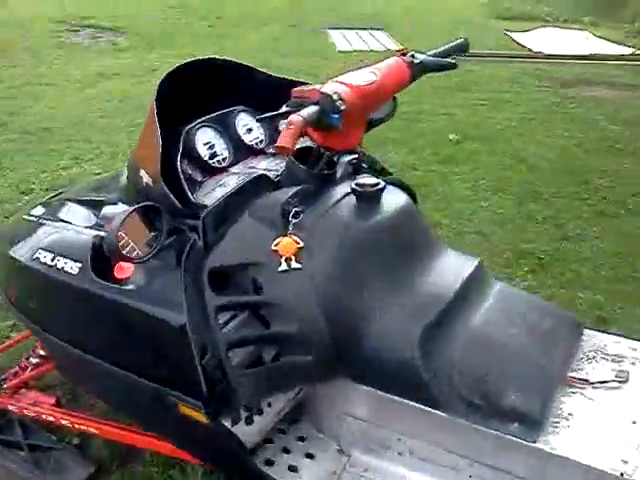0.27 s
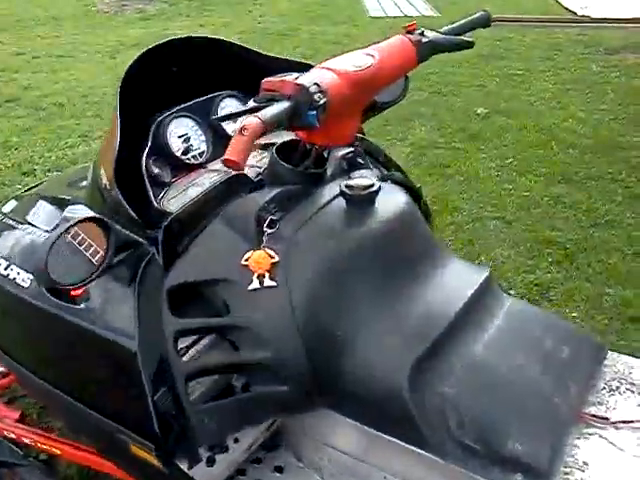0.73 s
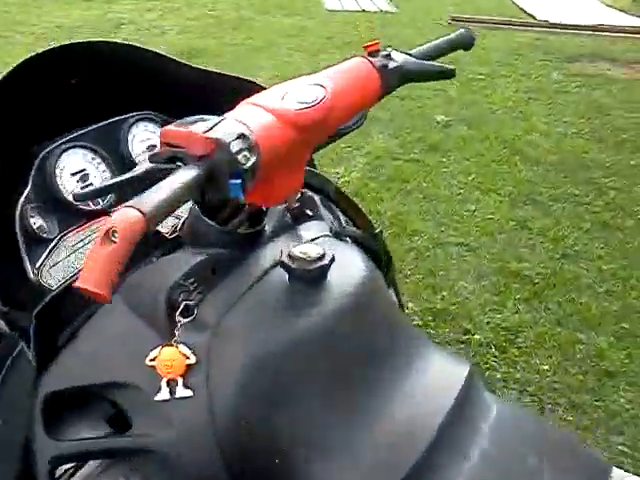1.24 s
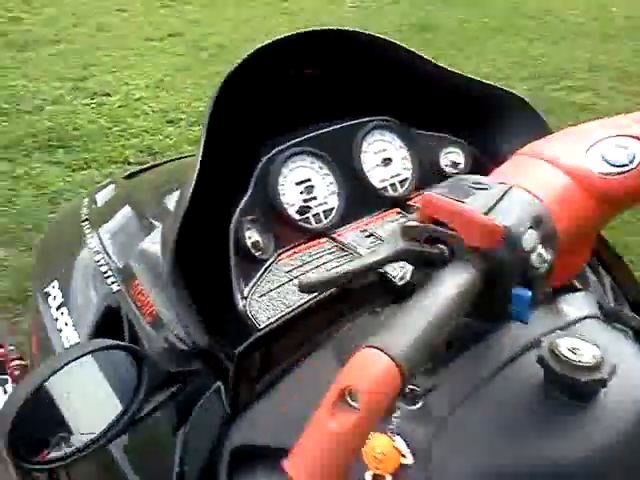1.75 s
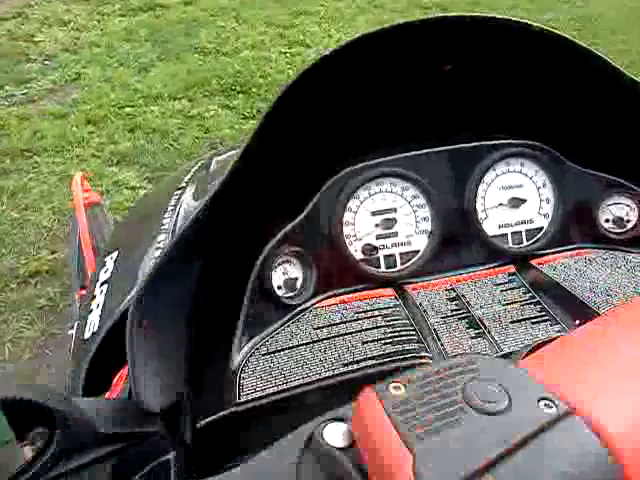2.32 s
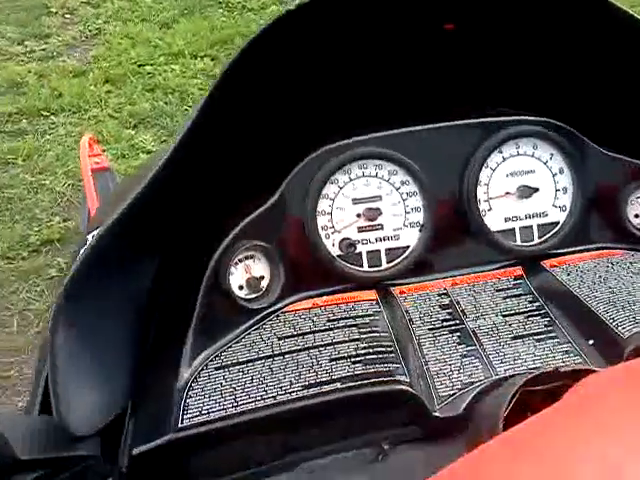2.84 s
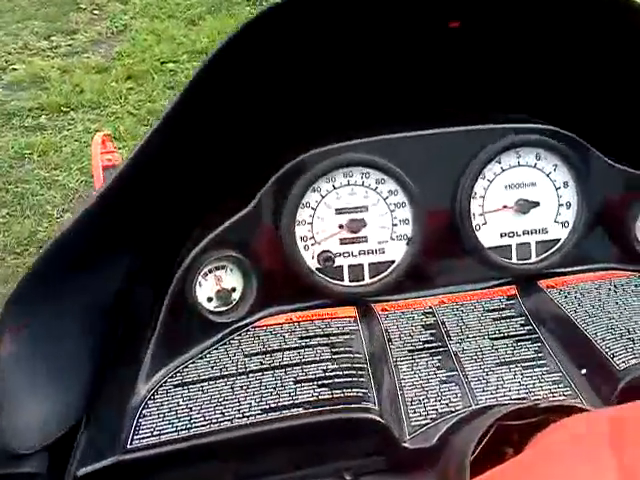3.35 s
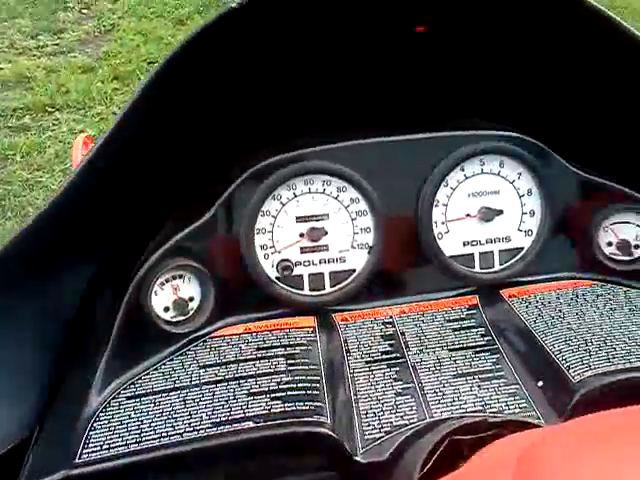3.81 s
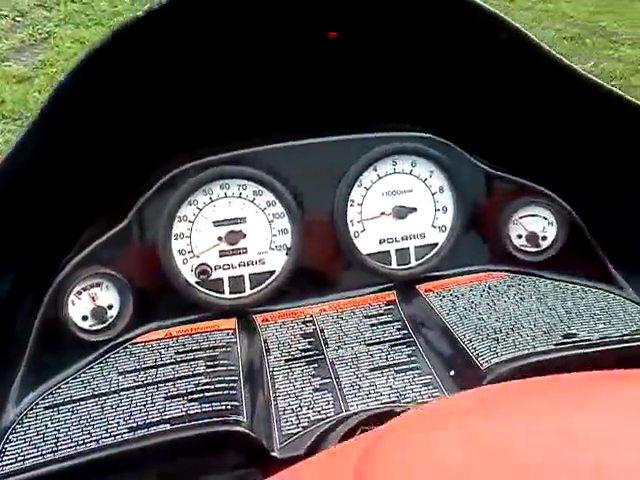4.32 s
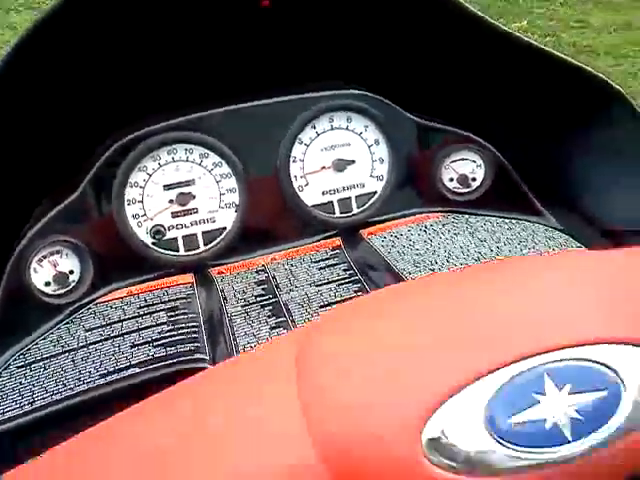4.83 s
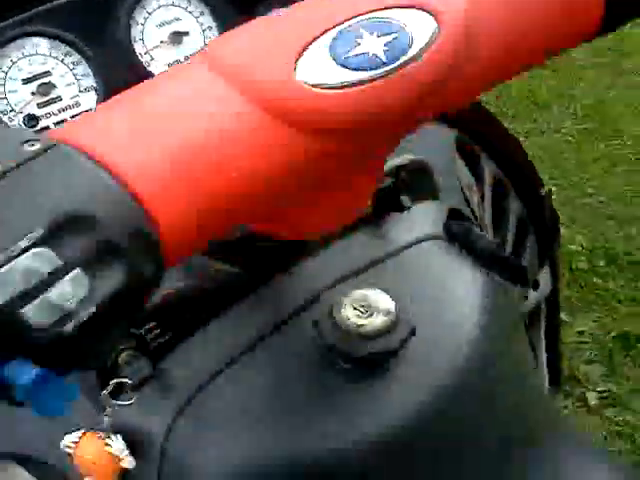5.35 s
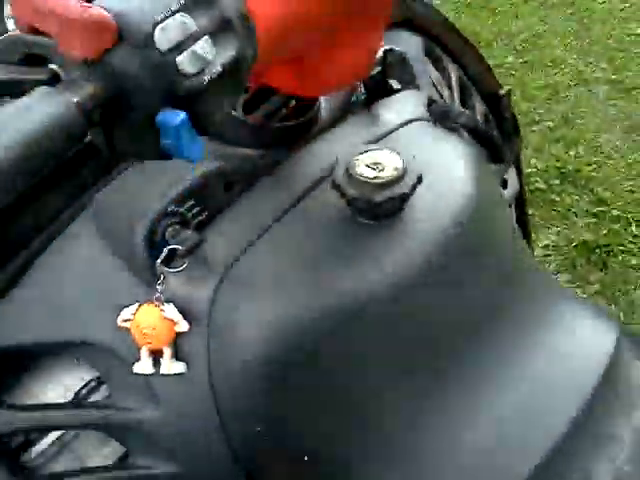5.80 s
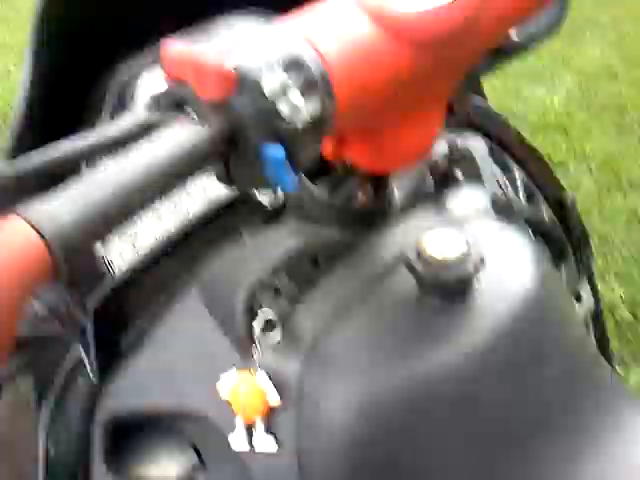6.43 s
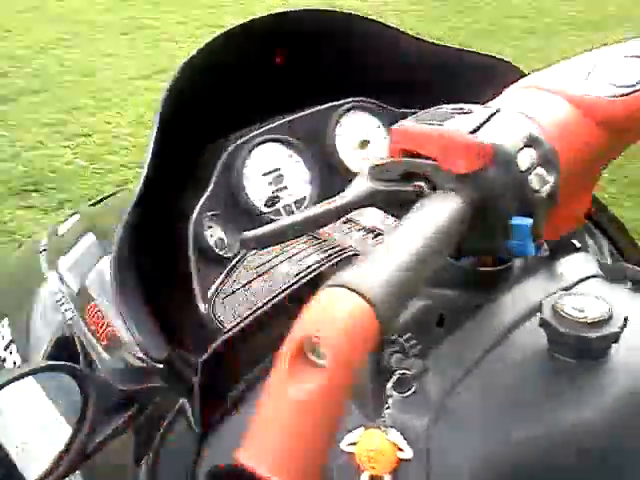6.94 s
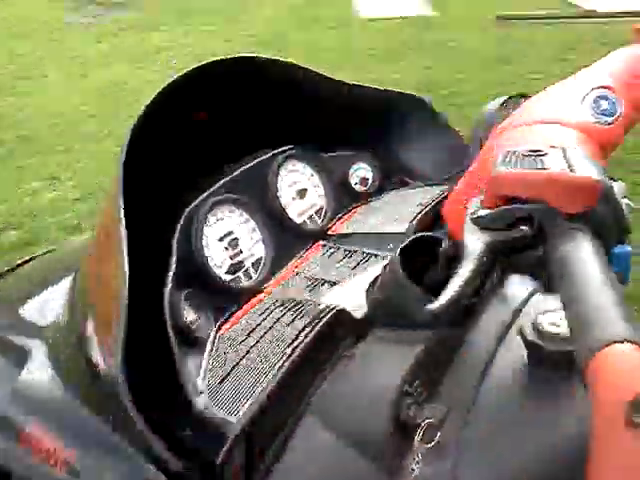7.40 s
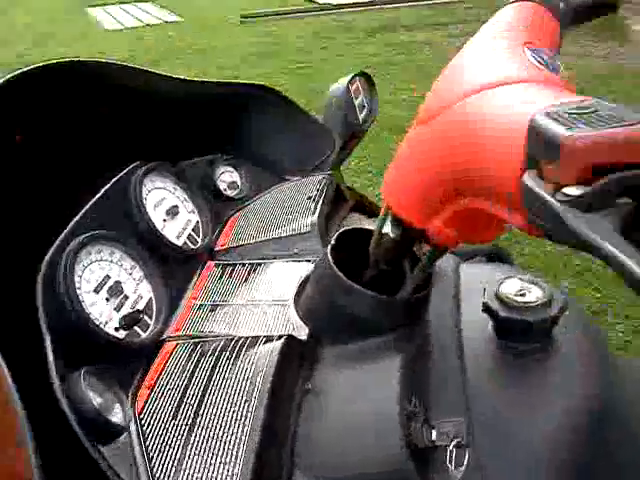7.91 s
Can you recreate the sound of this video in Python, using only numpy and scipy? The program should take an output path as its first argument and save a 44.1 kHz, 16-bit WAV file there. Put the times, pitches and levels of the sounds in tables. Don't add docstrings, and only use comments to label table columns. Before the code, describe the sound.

A small two-stroke engine idles unevenly outdoors, hollow booms popping in bursts over metallic clatter and rattles, muffled and overloaded by a cheap microphone.

```python
import sys
import numpy as np
from scipy import signal
from scipy.io import wavfile

SR = 44100
rng = np.random.default_rng(int(sys.argv[2]) if len(sys.argv) > 2 else 0)


def level_to_linear(level):
    exponent = np.asarray(level, float) / 20
    return 10 ** exponent


def pcm_store(signal):
    levels = np.round(np.clip(np.atleast_2d(signal), -1, 1) * 32767)
    wavfile.write(sys.argv[1], SR, levels.astype(np.int16).T)


N = 359856


def rms_one(x):
    return x / np.sqrt(np.mean(x ** 2) + 1e-20)


def drift(rate_hz):
    r = np.exp(-80 * np.pi * rate_hz / SR)
    slow = signal.lfilter([1], [1, -2 * r, r * r], rng.standard_normal(N // 40 + 2002))[2000:]
    return np.interp(np.arange(N) / 40, np.arange(len(slow)), rms_one(slow))


def ring(clicks, hz, t60_s):
    r, w = level_to_linear(-60 / (t60_s * SR)), 2 * np.pi * hz / SR
    return signal.lfilter([0, np.sin(w)], [1, -2 * r * np.cos(w), r * r], clicks + 1e-18)


# t/s, exhaust reach/dB, clatter level/dB, brightness/dB, hood resonance f/Hz
LISTENER = [(0, -2.5, -20.5, -10, 1250), (.6, -2.5, -22.5, 0, 1317), (1.3, -2.5, -19.5, 1.5, 1386),
            (1.9, -3, -21, 1, 1299), (2.5, -4.5, -19, -1, 1388), (3, -6.5, -20, -3, 1470),
            (3.45, -9, -19.5, -4, 1274), (3.9, -10, -20.5, -5.5, 1338), (4.6, -8.5, -19, -3, 1160),
            (5.2, -5.5, -18.5, -5.5, 1157), (5.6, -3, -19, -1.5, 1231), (6.3, -2.5, -19, -1, 1333),
            (6.7, -1.5, -19.5, 5, 1290), (7.4, -1.5, -18.5, 5, 1654), (7.8, -3, -19.5, 4, 1657),
            (8.16, -1, -15.5, 3, 1600)]


def listener_at(t_s):
    table_s, *columns = np.transpose(LISTENER)
    return [np.interp(t_s, table_s, column) for column in columns]


# t/s, rate/(strokes/s)
CRANK_SPEED = [(0.0, 48.09), (0.48, 45.93), (0.96, 46.63), (1.44, 47.91), (1.92, 46.52), (2.4, 49.14),
               (2.88, 48.74), (3.36, 45.14), (3.84, 48.07), (4.32, 47.92), (4.8, 46.83), (5.28, 48.18),
               (5.76, 48.86), (6.24, 48.5), (6.72, 46.77), (7.2, 48.32), (7.68, 48.02), (8.16, 47.1)]


def strokes_done():
    rate = np.interp(np.arange(N) / SR, *np.transpose(CRANK_SPEED))
    return -0.14 + np.cumsum(rate) / SR


def stroke_gate(depth_db, uneven):
    return level_to_linear(depth_db * (np.cos(2 * np.pi * strokes_done()) + uneven * drift(15)))


def share_db(hz, shares):
    low, bright, top = shares
    if hz < 900:
        return low
    if hz < 1950:
        return 0
    return bright if hz < 2500 else top


# f/Hz, density/(dB per Hz)
FAN_SPECTRUM = [(25, -21), (146, -20.5), (191, -13), (255, -9), (333, -15), (444, -20.5), (876, -17),
                (1170, -27), (1730, -20), (2400, -16), (2800, -20), (3400, -24.5)]


def fan_rush(shares, rumble_db, patchy_db):
    out, white = 0, rng.standard_normal((2, N))
    edges = 22 * 2 ** np.arange(0, 7.7, 1 / 3)
    hz_points, db_points = np.transpose(FAN_SPECTRUM)
    for k, (low, high) in enumerate(zip(edges, edges[1:])):
        sos = signal.butter(2, [low, high], "band", fs=SR, output="sos")
        band = signal.sosfilt(sos, white[k % 2])
        hz = np.sqrt(low * high)
        level_db = np.interp(np.log(hz), np.log(hz_points), db_points) + patchy_db * drift(38)
        heard_db = share_db(hz, shares) if hz > 400 else rumble_db
        out = out + band * level_to_linear(level_db + heard_db)
    return rms_one(out)


# f/Hz, level/dB, t60/s
METAL_MODES = [(683.3, -3, 0.06), (1000, -9, 0.035), (1181.7, -1.5, 0.088), (1470, -2, 0.062),
               (1744, 7.5, 0.013), (1821, -1, 0.048), (2066, 3, 0.057), (2967, -6.5, 0.055),
               (3190, -0.5, 0.08)]
# f/Hz, level/dB, t60/s
CLUTCH_MODES = [(2260, -4, .18), (2355, -3, .14)]


def rattle(shares, per_s):
    modes = [*METAL_MODES, *CLUTCH_MODES]
    sizes = level_to_linear(3.98 * np.minimum(rng.exponential(1, N), 4)) * rng.choice([-1, 1], N)
    clicks = sizes * (rng.random(N) < per_s / SR)
    struck = rng.integers(0, len(modes), N)
    out = 0
    for k, (hz, db, t60_s) in enumerate(modes):
        out = out + level_to_linear(db + share_db(hz, shares)) * ring(clicks * (struck == k), hz, t60_s)
    return rms_one(out)


def cavity(centre_hz, width_hz):
    white = rng.standard_normal((2, N))
    slow = signal.lfilter([1], [1, -np.exp(-np.pi * width_hz / SR)], white)
    phase = 2 * np.pi * np.cumsum(centre_hz) / SR
    return rms_one(slow[0] * np.cos(phase) + slow[1] * np.sin(phase))


# f/Hz, slide/(Hz per dB reach), width/Hz, level/dB, slope/(dB per dB reach)
DASH_CAVITIES = [(1304, 38, 130, -12.5, -0.78), (2817, 5.5, 200, -18.5, -1.08)]


def dash(reach_db):
    out = 0
    for hz, slide, width_hz, db, slope in DASH_CAVITIES:
        out = out + level_to_linear(db + slope * reach_db) * cavity(hz + slide * reach_db, width_hz)
    return out


def firing_jolt_db(fired, lift_db, lead_s, length_s):
    marks = np.zeros(N)
    marks[((fired[:, 0] - lead_s) * SR).astype(int).clip(0)] = 1
    return lift_db * signal.lfilter([1], [1, -np.exp(-1 / (length_s * SR))], marks)


def clatter(fired):
    reach_db, level_db, bright_db, hood_hz = listener_at(np.arange(N) / SR)
    # dB at rest, dB per dB reach, dB per dB brightness
    regions = [(-5, -0.44, -0.15), (-5, 0.032, 1.14), (-7.5, -0.11, 0.67)]
    shares = [rest + a * reach_db + b * bright_db for rest, a, b in regions]
    out = level_to_linear(3.5) * fan_rush(shares, 0.43 * reach_db + 3, patchy_db=2.5)
    out = out + level_to_linear(-3) * rattle(shares, per_s=540)
    out = out + level_to_linear(-5.5) * cavity(hood_hz, width_hz=330)
    out = out + dash(reach_db)
    jolt_db = firing_jolt_db(fired, lift_db=2.5, lead_s=0.0092, length_s=0.016)
    return level_to_linear(level_db + jolt_db) * stroke_gate(depth_db=1.2, uneven=1.0) * out


def knocks(table, t60_s, ring_db, crack_db):
    out, t = np.zeros(N + SR), np.arange(SR // 12) / SR
    chance, cracks = rng.random((len(table), 6)), rng.standard_normal((len(table), len(t)))
    for (s, db, hz), c, crack in zip(table, chance, cracks):
        partials_hz = hz * (1 + 0.1426 * (c[:3, None] - .5))
        tones = np.sin(2 * np.pi * (partials_hz * t + c[3:, None])).sum(axis=0)
        body = level_to_linear(ring_db - 60 * t / t60_s) * tones + level_to_linear(crack_db - 60 * t / .07) * crack
        start = round(s * SR)
        out[start:start + len(t)] += level_to_linear(db) * np.minimum(t / .0025, 1) * body
    return out[:N]


# t/s, peak level/dB, f/Hz
PANEL_THUMPS = [(0.198, -6, 357), (0.213, -3, 403), (1.011, -1.5, 391), (1.022, -29.5, 380),
                (1.379, -19.5, 368), (2.689, -16.5, 379), (3.163, -5, 712), (3.688, -27, 370),
                (4.723, -8.5, 437), (4.917, -3, 716), (6.132, -28, 404), (7.732, -7.5, 465.7),
                (7.922, 3.5, 367), (8.015, 1, 434)]


def panel_thumps():
    return knocks(PANEL_THUMPS, t60_s=0.054, ring_db=-7.5, crack_db=-25.5)


def piston_slaps():
    done = strokes_done()
    s = np.interp(np.arange(1, int(done[-1])), done, np.arange(N) / SR)
    chance = rng.random((len(s), 3))
    _, clatter_db, _, hood_hz = listener_at(s)
    db = clatter_db + 5.5 + 5 * chance[:, 1]
    hz = hood_hz * (.72 + .7 * chance[:, 2] ** 2)
    return np.transpose([s, db, hz])[chance[:, 0] < .2]


# t/s, peak level/dB, f/Hz
METAL_KNOCKS = [(0.066, -4.5, 1190), (0.656, -2, 1317), (1.202, -12, 1145), (1.576, -10.5, 1570),
                (1.743, -7.5, 1175), (1.919, -8, 1133), (2.309, -2, 1167), (2.542, -3.5, 1210),
                (2.706, -1.5, 1282), (2.869, -2, 1920), (3.035, -3, 1457), (3.589, -7.5, 1606),
                (3.996, -2.5, 1436), (4.394, -7, 972), (4.493, -6, 1050), (4.582, -2.5, 1007),
                (5.17, -2.5, 1144), (5.339, -8.5, 1116), (5.444, -6, 1010), (5.569, -8.5, 1196),
                (6.061, -0.5, 1935), (6.835, -3.5, 1716), (6.917, -2, 1730), (7.092, -4.5, 2250),
                (7.192, -4, 1975), (7.317, -1.5, 1842), (7.543, 0, 1850), (7.646, 1, 1470),
                (7.878, 1.5, 1937), (7.959, -8.5, 1500)]


def metal_knocks():
    table = np.vstack([METAL_KNOCKS, piston_slaps()])
    return level_to_linear(4.5) * knocks(table, t60_s=0.087, ring_db=-13, crack_db=-8)


# t/s, firings/count, spacing/ms, level/dB
FIRING_RUNS = [(0.047, 8, 123.6, -1.4), (0.069, 2, 38.5, -4.4), (0.235, 6, 80.5, -3.2),
               (0.255, 2, 83.9, -5.0), (0.693, 4, 121.3, -2.4), (0.895, 2, 89.6, -4.6),
               (1.122, 8, 129.3, -1.9), (1.219, 4, 63.5, -2.1), (1.532, 6, 86.2, -2.3),
               (2.09, 2, 130.4, -3.1), (2.192, 8, 62.4, -2.0), (2.666, 6, 57.8, -2.5),
               (3.081, 2, 38.5, -3.0), (3.244, 8, 125.9, -3.6), (3.512, 3, 85.0, -6.5),
               (3.938, 8, 122.4, -1.0), (3.963, 2, 134.9, -4.8), (4.859, 8, 63.5, -3.4),
               (5.41, 3, 59.0, -1.7), (5.693, 4, 130.4, -3.4), (5.859, 8, 79.4, -3.1),
               (6.187, 3, 60.1, -6.2), (6.373, 8, 99.8, -3.5), (6.648, 5, 98.6, -4.4),
               (7.108, 2, 133.8, -3.4), (7.217, 3, 60.1, -1.5), (7.394, 6, 93.0, -3.0),
               (7.43, 4, 132.7, -5.7), (7.895, 3, 114.5, -3.0), (8.029, 2, 38.5, -4.8)]
# t/s, level/dB, gas blow/ms
LONE_FIRINGS = [(0.014, -3, 20.0), (0.101, -7, 10), (0.466, -2.5, 12.0), (1.727, -1, 23), (2.469, -6.5, 37),
                (2.743, 1, 13), (2.797, -7.5, 8.7), (2.825, 3.5, 5.8), (3.11, -8, 12.0), (3.192, 2.5, 7.8),
                (3.283, 0, 9.7), (3.355, 2, 13), (3.382, -2, 7.1), (3.614, -7.5, 8.4), (3.811, -7, 7.3),
                (4.253, 5, 5.8), (4.319, -4, 6.8), (4.607, 4.5, 6.4), (4.684, -6, 30), (5.432, -4.5, 14),
                (5.521, -8, 19), (5.634, -6.5, 16), (5.666, -6, 32.0), (5.797, 3, 12.0), (5.852, -6.5, 40),
                (5.92, -3.7, 16), (6.589, -6, 24.0), (6.641, 1, 9), (6.936, -2, 11), (7.507, -8.8, 53)]


def firings():
    rows = [tuple(row) for row in LONE_FIRINGS]
    for s, count, gap_ms, db in FIRING_RUNS:
        rows += [(s + k * gap_ms / 1000, db, 23.4) for k in range(round(count))]
    s, db, blow_ms = np.transpose(sorted(rows))
    reach_db, chance = listener_at(s)[0], rng.standard_normal((len(s), 2))
    hz = 276.3 + 1.78 * reach_db + 8.5 * chance[:, 0]
    return np.transpose([s, db + reach_db + 0.54 * chance[:, 1], hz, blow_ms])


# f/Hz, level/dB, t60/s
SHELL_MODES = [(277.97, 0, 0.57), (247.4, -4, 0.07)]


def booms(fired, lead_s, rise_s, fall_s, overdrive_db):
    blow, pitch_hz, t = np.zeros(N + SR), np.full(N, fired[0, 2]), np.arange(SR // 8) / SR
    for s, db, hz, blow_ms in fired:
        shape = (1 - np.exp(-(t / rise_s) ** 2)) / (1 + np.exp((t - blow_ms / 1000) / fall_s))
        start = round((s - lead_s) * SR)
        blow[start:start + len(t)] += level_to_linear(db + overdrive_db) * shape
        pitch_hz[start:] = hz
    out = blow[:N] * np.sin(2 * np.pi * np.cumsum(pitch_hz) / SR)
    shell = sum(level_to_linear(db) * 14 / (t60_s * SR) * ring(out, hz, t60_s) for hz, db, t60_s in SHELL_MODES)
    return out + shell


# f/Hz, width/Hz, level/dB
CHAMBER_MODES = [(223, 24, -5), (247, 16, 2), (281, 14, 4), (304, 22, -2.5)]


def chambers(x):
    for hz, width_hz, db in CHAMBER_MODES:
        w, gain = 2 * np.pi * hz / SR, level_to_linear(db / 2)
        a = np.pi * width_hz / SR
        zeros = [1 + a * gain, -2 * np.cos(w), 1 - a * gain]
        poles = [1 + a / gain, -2 * np.cos(w), 1 - a / gain]
        x = signal.lfilter(zeros, poles, x)
    return x


def scene():
    fired = firings()
    engine = clatter(fired)
    exhaust = booms(fired, lead_s=0.0069, rise_s=0.0062, fall_s=0.0025, overdrive_db=5.5)
    return (chambers(engine + exhaust) + panel_thumps() + metal_knocks())[None]


def limiter(x):
    limit_db, squeeze, attack_s, release_db_per_s = -2.5, 0.76, 0.0019, 261
    look_ahead_samples = 100
    ramp_db = release_db_per_s * np.arange(N) / SR
    over_db = np.maximum(20 * np.log10(np.abs(x) + 1e-9) - limit_db, 0)
    held_db = np.maximum.accumulate(over_db + ramp_db, axis=-1) - ramp_db
    early_db = np.roll(held_db, -look_ahead_samples, axis=-1)
    r = np.exp(-1 / (attack_s * SR))
    return x * level_to_linear(-squeeze * signal.lfilter([1 - r], [1, -r], early_db))


def low_pass(x):
    return signal.sosfilt(signal.butter(12, 15900, fs=SR, output="sos"), x)


def record(dry):
    x = signal.sosfilt(signal.butter(1, 120, "high", fs=SR, output="sos"), dry)
    x = signal.sosfilt(signal.butter(12, 3550, fs=SR, output="sos"), x)
    x = signal.sosfilt(signal.cheby2(14, 60, 4900, fs=SR, output="sos"), x)
    mix = np.clip(limiter(x), -.715, .715)
    return low_pass(mix)


dry = scene()
out = record(dry)
pcm_store(out)
```